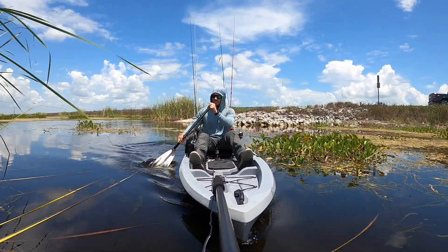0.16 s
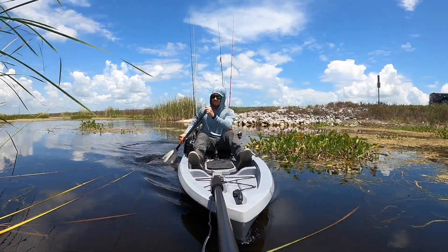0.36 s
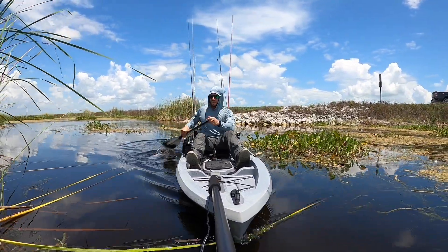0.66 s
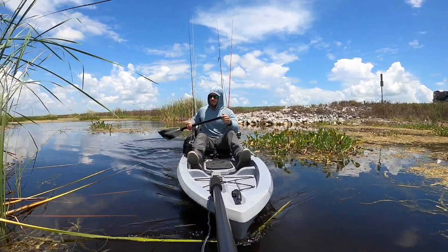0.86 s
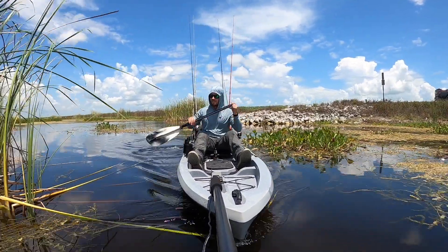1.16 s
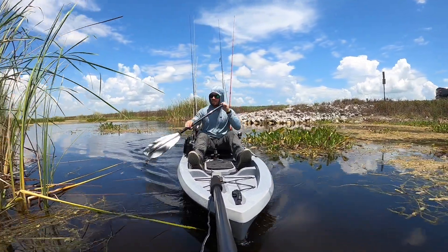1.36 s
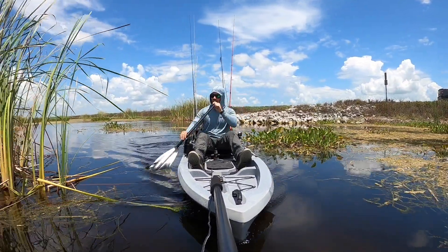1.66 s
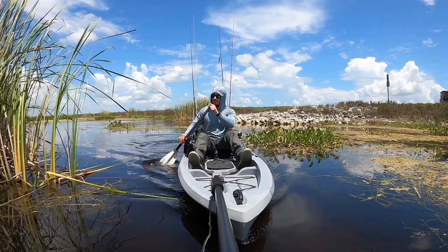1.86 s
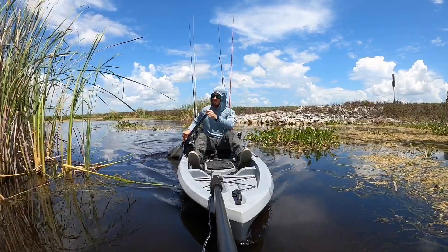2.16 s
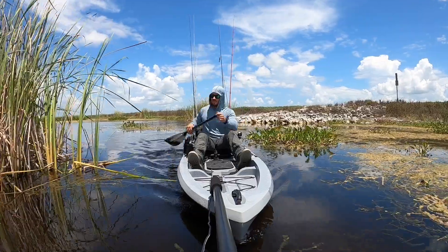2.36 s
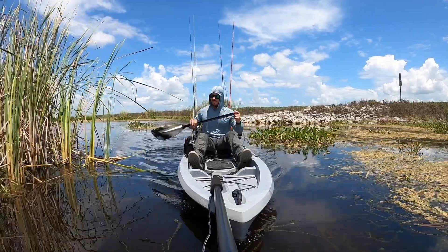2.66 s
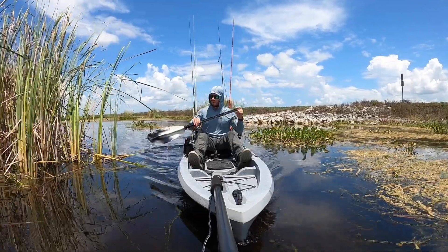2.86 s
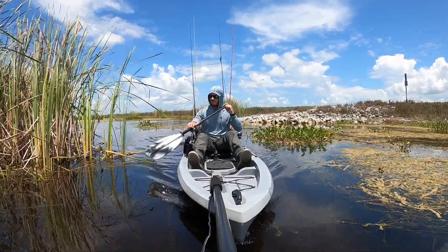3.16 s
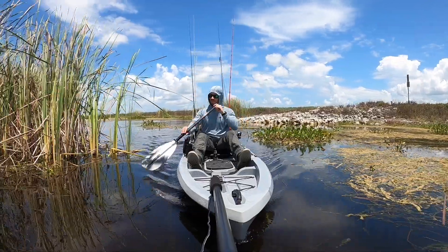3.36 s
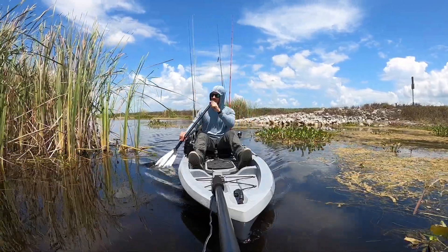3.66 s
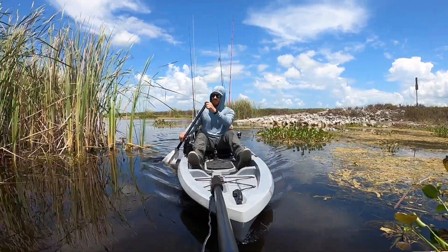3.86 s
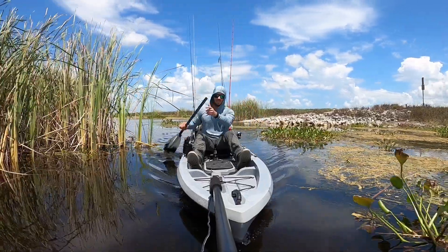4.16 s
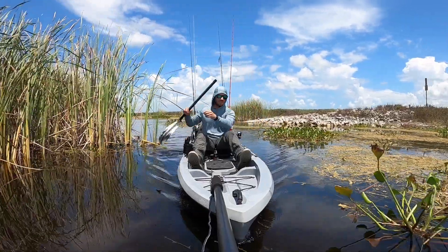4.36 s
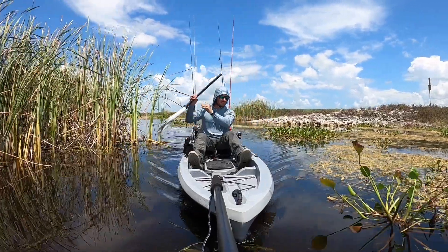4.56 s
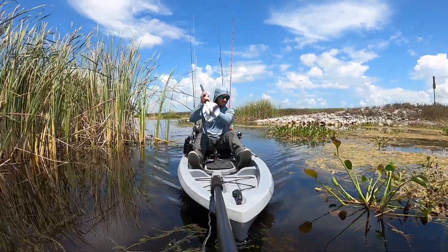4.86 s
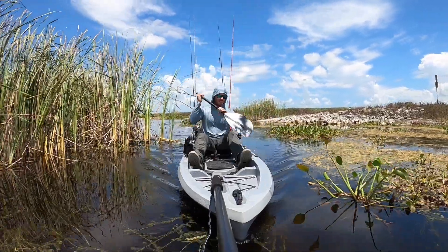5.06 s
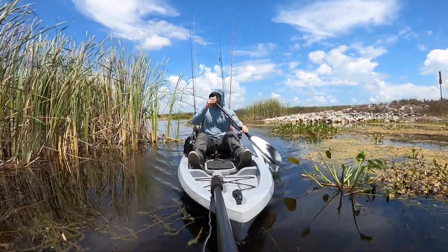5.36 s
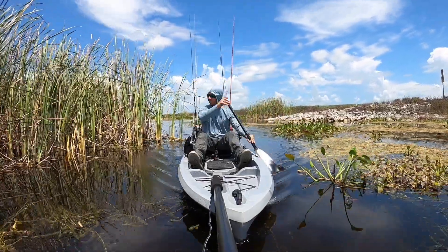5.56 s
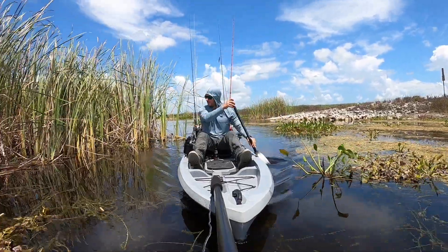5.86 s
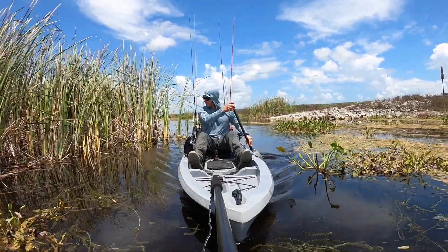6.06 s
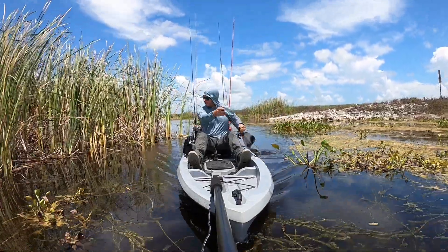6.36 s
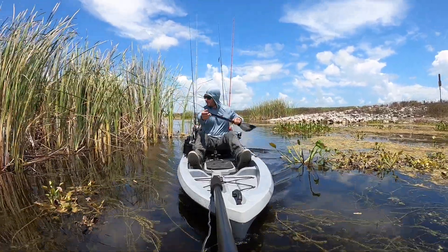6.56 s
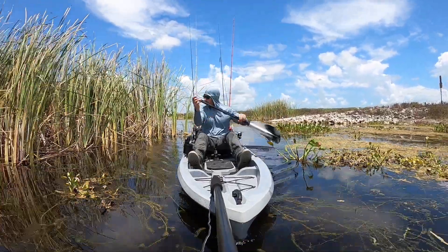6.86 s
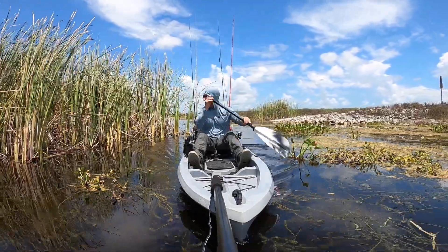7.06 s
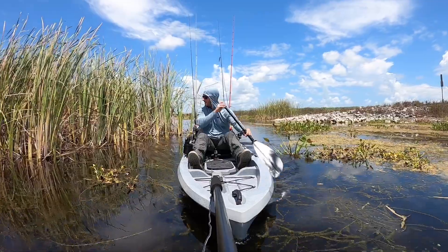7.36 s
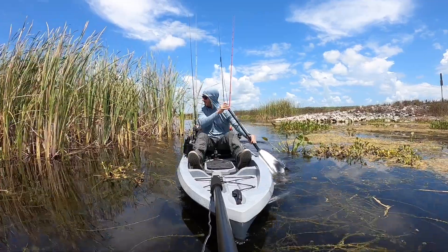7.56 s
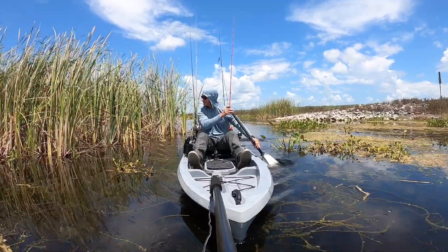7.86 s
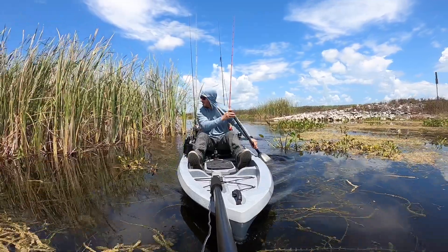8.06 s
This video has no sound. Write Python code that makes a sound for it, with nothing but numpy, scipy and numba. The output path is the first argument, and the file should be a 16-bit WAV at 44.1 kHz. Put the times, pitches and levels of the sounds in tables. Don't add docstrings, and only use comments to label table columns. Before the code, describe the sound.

Close stereo view from over the bow of a plastic kayak in shallow, weedy water outdoors. The paddle churns up gurgles, round bubble plops and bright drips, densest in the first two and a half seconds, with a sharp stem snap early. Quieter gaps and separate plops follow, then more strokes from the right and a double knock on the hull near the end. A distant engine wavers low beneath.

```python
import sys
import numpy as np
from scipy import signal
from scipy.fft import rfft, irfft
from scipy.io import wavfile
from scipy.ndimage import uniform_filter1d
from numba import njit

SR = 44100
rng = np.random.default_rng(int(sys.argv[2]) if len(sys.argv) > 2 else 0)


def undo_db(level):
    steps = np.asarray(level, float) / 20
    return 10 ** steps


def unload_wav(signal):
    wavfile.write(
        sys.argv[1],
        SR,
        np.round(np.clip(np.atleast_2d(signal).T, -1, 1) * 32767).astype(np.int16),
    )


N = 362061
OPPOSITE = np.array([[1], [-1]])


def unit(x):
    return x / np.sqrt(np.mean(x ** 2))


def curve(table):
    return np.interp(np.arange(N) / SR, *np.transpose(table))


def walk(rate):
    hold = int(SR / rate)
    steps = np.repeat(rng.standard_normal(N // hold + 1), hold)
    return 1.3 * uniform_filter1d(uniform_filter1d(steps, hold), hold)[:N]


def band(x, lo_hz, hi_hz):
    return signal.sosfilt(signal.butter(2, [lo_hz, min(hi_hz, 20000)], "band", fs=SR, output="sos"), x)


def pan(db):
    return undo_db(np.array([db, -db]) / 2)


def add(out, s, sound, side_db):
    i = int(round(s * SR))
    out[:, i:i + sound.shape[-1]] += (sound * pan(side_db)[:, None])[:, :N - i]


def humps(rows, rest_db):
    t = np.arange(0, N + 64, 64) / SR
    power = undo_db(2 * rest_db)
    for s, db, rise, fall in rows:
        tens_down = np.where(t < s, (s - t) / max(rise, 1e-3), (t - s) / max(fall, 1e-3))
        power = power + undo_db(2 * db - 20 * tens_down)
    return np.interp(np.arange(N) / SR, t, 10 * np.log10(power))


@njit
def ring(rows, n):
    out = np.zeros((2, n))
    for r in rows:
        start, left, w, phase = int(r[0] * SR), 10 ** (r[6] / 40), 2 * np.pi * r[2] / SR, 0.
        glide = 2 ** (r[3] / SR)
        fade = 1000 ** (-1 / (r[5] * SR))
        swell = np.exp(-1 / (r[4] * SR + 1))
        a, gap = r[1], 1.
        for i in range(start, min(n, start + int((r[5] + 3 * r[4]) * SR))):
            phase += w
            w = min(w * glide, 2.8)
            gap *= swell
            a *= fade ** (1 - gap)
            v = a * (1 - gap) * np.sin(phase)
            out[0, i] += v * left
            out[1, i] += v / left
    return out


# (frequency [Hz], level per Hz [dB])
ROAD_COLOUR = [(15, -52), (30, 5.5), (50, 7.5), (100, 8.5), (220, -9.5), (260, -12.5), (600, -25.5),
               (1000, -24.5), (1400, -32.5), (2200, -52), (3200, -57.5), (7500, -53), (13000, -62.5),
               (15700, -80.5)]


def road():
    hz = np.maximum(np.arange(N // 2 + 1) * SR / N, 1)
    colour_hz, colour_db = np.transpose(ROAD_COLOUR)
    colour = undo_db(np.interp(np.log(hz), np.log(colour_hz), colour_db))
    mid, side = rfft(rng.standard_normal((2, N))) * colour
    side = side * np.clip(.1 + 12 / hz + hz / 5000, 0, 1)
    lean = pan(-4. * np.clip(hz / 9300.0, 0, 1))
    hum = unit(irfft(lean * [mid + side, mid - side], N))
    return undo_db(-35.5 + 1.0 * walk(3.76)) * hum


# (time [s], level [dB])
INSECT_LEVEL = [
    (0.0, -95),
    (0.91, -82),
    (2.81, -83.5),
    (3.45, -75),
    (3.86, -90),
    (5.19, -75),
    (5.56, -78),
    (6.52, -74),
    (6.75, -86),
    (8.21, -75),
]


def insects():
    hiss = unit(band(rng.standard_normal((2, N)), 10600, 13800))
    rasp_db = 2.3 * walk(120) + 1.3 * walk(4.5)
    return undo_db(curve(INSECT_LEVEL) - 0.5 + rasp_db) * hiss * pan(-2.0)[:, None]


# (frequency [Hz], width [Hz], level [dB])
ENGINE_ORDERS = [
    (135.46, 12.4, -43),
    (159.75, 15.5, -45.5),
    (211.4, 28.7, -49.5),
    (297.7, 17, -66.5),
]
# (time [s], peak level [dB])
ENGINE_SWELLS = [(.28, -25.5), (.849, -32), (1.09, -25), (1.42, -28.5), (1.67, -25), (2.02, -30),
                 (2.22, -29), (2.78, -31), (3.13, -27.5), (3.57, -31.5), (3.82, -30.5), (4.51, -27),
                 (4.72, -29.5), (4.93, -32), (5.24, -30), (5.6, -32.5), (5.85, -31.5), (6.33, -26),
                 (6.67, -28), (6.939, -29), (7.2, -34.5), (7.5, -30.5), (7.75, -30.5), (8.115, -27.5)]


def engine():
    firing_hz, lull_db, fade_s = 68.77, -39, .15
    level_db = humps([(s, db, fade_s, fade_s) for s, db in ENGINE_SWELLS], lull_db)
    phase = 2 * np.pi * firing_hz * np.cumsum(1 + 0.0344 * walk(14)) / SR
    out = np.sqrt(2) * undo_db(level_db + 2.2 * walk(18)) * np.sin(phase)
    for hz, width, db in ENGINE_ORDERS:
        out = out + undo_db(db) * unit(band(rng.standard_normal(N), hz - width / 2, hz + width / 2))
    return out


# (time [s], peak level [dB], frequency [Hz])
TICK_DROPS = [(0.129, -35.5, 2500), (0.1641, -42, 6300), (0.3226, -32.5, 2530), (0.5183, -47.0, 7980),
              (0.553, -43.0, 6300), (0.7276, -47.5, 10000), (1.056, -40, 5000), (1.1572, -44, 3000),
              (1.6463, -55, 8000), (1.96, -47, 9900), (2.0375, -53, 8000), (2.393, -39, 6330),
              (2.4672, -42.5, 6300), (2.851, -53.5, 10000), (2.9922, -48.0, 8000), (3.291, -56, 6300),
              (3.462, -46.5, 6400), (3.739, -45, 3200), (4.1256, -43, 8950), (4.1908, -46, 6300),
              (4.3025, -47, 6300), (4.3426, -32, 2500), (4.3838, -48.5, 10000), (4.414, -47.5, 10000),
              (5.914, -49, 5000), (6.2114, -41, 2400), (6.4432, -47.0, 6300), (6.5484, -54, 6300),
              (6.6632, -49, 6300), (6.9173, -45.5, 4000), (7.0303, -48, 6300), (.0853, -46, 2500),
              (7.125, -52.0, 10000), (1.7989, -44, 9000), (8.1889, -43, 4000), (7.5039, -50, 2100),
              (7.597, -45, 5000), (7.77, -49.0, 6300), (7.9753, -48, 4970), (8.037, -41, 3200),
              (8.064, -41, 3200)]


def ticks():
    out, t = np.zeros((2, N)), np.arange(int(0.026 * SR)) / SR
    shape = np.exp(-t / 0.0017) + .12 * np.exp(-t / .008)
    for s, db, hz in TICK_DROPS:
        mid, side, where = rng.standard_normal((3, len(t)))
        click = unit(band(mid + 0.33 * side * OPPOSITE, 0.69 * hz, 1.18 * hz))
        add(out, s, undo_db(db - 3.5) * click * shape, 2.5 * where[0] - hz / 2500)
    return out


# (time [s], level [dB])
HULL_KNOCKS = [
    (7.417, -17.5),
    (7.446, -29),
]
# (frequency [Hz], level [dB], t60 [s])
HULL_MODES = [(104.8, -6, 0.54), (134, -3, 0.36), (172, -3, 0.213), (192, 4.5, 0.19), (240, -10.5, 0.38),
              (278, 3.5, 0.071), (415, 8, 0.024), (462, -1.5, 0.038), (950, 2.5, 0.025),
              (1400, -9.5, 0.023), (1890, -8, 0.017), (2300, -4.5, 0.01), (2800, -7.5, 0.0076)]


def knock():
    rows = []
    for s, db in HULL_KNOCKS:
        for hz, mode_db, t60 in HULL_MODES:
            size = undo_db(db + mode_db + 2.17 * rng.standard_normal())
            rows.append((s + 0.59 / hz, size, hz, 0., 0.31 / hz, t60, -4.))
    return ring(np.array(rows), N)


# (time [s], peak level [dB], frequency [Hz], half width [s])
STEM_SNAP = (.60112, -5.5, 3500, .00013)


def stem_snap():
    out = np.zeros((2, N))
    s, db, hz, width = STEM_SNAP
    t = np.arange(-40, 40) / SR
    pulse = np.exp(-.5 * (t / width) ** 2) * np.cos(2 * np.pi * hz * t + .3)
    add(out, s + t[0], undo_db(db) * pulse, 1.5)
    return out


# (time [s], left minus right [dB])
PADDLE_SIDE = [
    (0, -0.5),
    (5, 2),
    (5.6, -2),
    (8.21, -2),
]


def paddle_side(s):
    return np.interp(s, *np.transpose(PADDLE_SIDE))


# (time [s], peak level [dB], frequency [Hz])
WATER_SLAPS = [(.784, -28, 3600), (0.928, -30.5, 5250), (1.1518, -32, 4370), (1.662, -33, 3600),
               (1.749, -38.5, 4100), (1.805, -33.5, 5500), (1.8348, -29, 3280), (1.9187, -37, 4740),
               (2.2922, -31, 3220), (2.309, -33, 3870), (2.4145, -34.5, 3770), (2.797, -35.5, 3200),
               (3.645, -36, 5750), (3.656, -32, 6600), (3.7477, -32.5, 3460), (4.1249, -40, 3820),
               (4.1474, -26.5, 3770), (4.285, -38, 3430), (6.4712, -36, 5400), (6.5364, -38, 4600),
               (7.1507, -31, 5500), (7.4165, -30, 3500), (7.445, -31.5, 3720), (7.5423, -44, 3350),
               (7.718, -41, 3240), (7.8913, -43.5, 4650), (8.0924, -37, 3830)]


def slaps():
    out, t = np.zeros((2, N)), np.arange(int(.06 * SR)) / SR
    shape = (1 - np.exp(-t / 0.00023)) * (np.exp(-t / 0.0032) + 0.17 * np.exp(-t / 0.011))
    for s, db, hz in WATER_SLAPS:
        rumble = rng.standard_normal((2, len(t))).cumsum(axis=0)
        fizz = unit(band(band(rumble, 0.5 * hz, 1.31 * hz), 100, 2.0 * hz))
        add(out, s, undo_db(db - 8.0) * fizz * shape, paddle_side(s) + 3 * rng.standard_normal())
    return out


# (time [s], peak level [dB], start frequency [Hz], rise [octaves/s], length [s])
POCKET_GLUGS = [
    (0.58, -25, 319, 5.4, 0.014),
    (0.887, -26.5, 647, 33.8, 0.037),
    (3.813, -54, 1750, 99, 0.013),
    (7.951, -34.5, 603, 0.29, 0.055),
    (2.811, -33.5, 278, 3.1, 0.016),
    (6.681, -39, 385, 1.5, 0.02),
]


def glugs():
    out = np.zeros((2, N))
    for s, db, hz, rise, length in POCKET_GLUGS:
        swelling = min(.05 + 0.015 * rise, 0.68)
        t = np.arange(int(length * SR)) / SR
        swell = np.sin(np.pi / 2 * np.interp(t, [0, swelling * length, length], [0, 1, 0]))
        tone = np.sin(2 * np.pi * hz * np.cumsum(2 ** (rise * t)) / SR)
        add(out, s, undo_db(db) * swell * tone, paddle_side(s))
    return out


# (time [s], peak level [dB], frequency [Hz])
BURSTING = [(.309, -26, 1130), (.643, -12, 670), (.712, -17, 1320), (1.259, -31, 1980), (1.356, -23, 1020),
            (1.807, -27, 2560), (2.361, -17.5, 1220), (2.367, -18.5, 910), (2.369, -18.5, 2100),
            (2.448, -25, 1260), (2.696, -33, 2840), (3.861, -35, 1350), (4.148, -23, 2110),
            (4.285, -32.5, 3350), (5.654, -30.5, 1745), (6.349, -25.5, 1570), (6.688, -26, 1540),
            (7.624, -15.5, 1530), (7.579, -27.5, 2060)]
# (time [s], peak level [dB], frequency [Hz], rise [octaves/s])
RINGING = [(.169, -33, 1490, 16), (.66, -28, 566, 7), (.664, -21.5, 1030, 0), (1.668, -30.5, 2470, 44),
           (1.838, -29.5, 1390, -1), (1.983, -23.5, 1400, -5), (2.084, -28, 980, 8), (2.091, -30, 1660, 31),
           (2.221, -23.5, 2110, 25), (.717, -26, 605, 3.5), (2.298, -24, 1210, 105), (2.368, -18, 570, 0),
           (1.195, -30, 557, -4), (3.648, -26, 824, 17), (3.748, -13.5, 1077, 69), (3.831, -35, 2300, 20),
           (3.963, -35, 1120, 24), (4.068, -26.5, 1200, 63), (4.148, -25.5, 2990, 81),
           (4.15, -16.5, 1334, -14), (4.284, -30, 1720, 4), (4.541, -37, 1457, -15),
           (5.723, -27.5, 1805, 32), (6.211, -29, 1500, -8), (6.249, -26, 1530, 35.5),
           (6.25, -21.5, 950, 6), (6.515, -24.5, 1170, -8.5), (7.621, -18, 1090, -6), (8.188, -35, 1674, 8)]
# (time [s], peak level [dB], frequency [Hz], t60 [s], rise [octaves/s])
HELD_UNDER_WEEDS = [(.248, -29, 950, 0.033, 10), (.38, -35.5, 482, 0.15, 5), (.446, -32.5, 1007, 0.061, 15),
                    (.713, -20, 890, 0.039, 7), (1.165, -27.5, 913, 0.055, -1.5),
                    (1.749, -26, 1040, 0.041, 2), (1.848, -35, 1350, 0.07, -6), (1.9, -34, 1150, 0.11, -2),
                    (2.065, -29.5, 1040, 0.039, 33), (2.123, -34, 950, 0.13, 5),
                    (2.125, -35.5, 481, 0.11, -0.5), (2.262, -23, 1225, 0.024, 8),
                    (2.81, -29, 399, 0.047, 27), (4.012, -35.5, 1690, .035, 11),
                    (4.15, -25.5, 732, 0.059, 0.5), (5.83, -44.5, 1500, 0.031, 98),
                    (5.742, -46, 2180, 0.025, 58), (6.214, -21.5, 880, 0.029, 13),
                    (6.449, -29.5, 1015, 0.052, 20.5), (6.31, -33.5, 690, 0.11, -6.5),
                    (6.345, -36, 560, .07, -4), (6.29, -43, 766, .05, -1), (.565, -26.5, 770, .02, 21),
                    (7.551, -25, 957, 0.041, 6), (7.575, -28.5, 843, 0.04, 13),
                    (7.724, -41, 1580, 0.034, -6), (8.1, -39, 1550, 0.091, -12)]
# (time [s], peak level [dB], frequency [Hz])
BLADE_TRICKLE = [(.06, -41, 1090), (.34, -39, 1030), (.353, -37, 1015), (.366, -38.5, 1680),
                 (.371, -37, 1210), (.491, -30, 984), (.503, -31, 950), (.508, -30.5, 1240),
                 (.526, -36, 1340), (.578, -24.5, 538), (.606, -30, 1260), (.628, -27, 1070),
                 (.66, -31, 595), (.862, -31.5, 1070), (.87, -30.5, 1420), (1.113, -38, 1220),
                 (1.139, -40, 1120), (1.164, -35, 554), (1.22, -36, 1030), (1.266, -39, 1680),
                 (1.861, -39, 1130), (1.88, -38, 1090), (1.886, -35, 1400), (1.918, -38, 1165),
                 (2.103, -35.5, 1020), (2.117, -34, 1210), (2.126, -35, 1550), (2.146, -35, 1590),
                 (2.191, -31, 1080), (2.227, -28, 1210), (2.261, -31, 688), (2.294, -34, 870),
                 (2.312, -33, 633), (2.313, -30, 1030), (2.322, -32, 1420), (2.331, -27, 825),
                 (2.462, -34, 1280), (2.489, -37, 1410), (2.526, -36, 1010), (2.584, -39, 1280),
                 (2.713, -38.5, 1080), (2.753, -36.5, 1420), (3.648, -34, 1320), (3.994, -38, 1080),
                 (4.068, -37, 727), (4.123, -30.5, 880), (4.179, -37, 690), (4.224, -39, 1250),
                 (4.246, -38, 1470), (4.357, -41, 1590), (4.409, -36, 1260), (4.447, -42, 1210),
                 (4.516, -43, 1420), (4.518, -39, 1065), (5.72, -37.5, 1036), (5.746, -41, 1080),
                 (5.901, -39, 980),
                 (6.197, -35.5, 1250), (6.418, -37, 830), (6.432, -35, 1680), (6.572, -40, 780),
                    (6.651, -35, 1330), (6.695, -34, 1210), (7.148, -43, 1240), (7.356, -40, 1160),
                    (7.59, -30.5, 950), (7.734, -36.5, 1450), (7.871, -43, 726), (8.092, -43, 640)]
# (time [s], peak level [dB], frequency [Hz])
FALLING_DROPLETS = [(.13, -36, 2370), (.181, -37, 1930), (.323, -40, 2890), (.344, -32.5, 4000),
                    (.392, -37, 3250), (.424, -36, 2020), (.52, -33, 2240), (.663, -34, 2540),
                    (.729, -30, 2310), (.812, -32, 3010), (.841, -34, 3790), (.927, -35, 5200),
                    (1.106, -37, 3490), (1.668, -30.5, 3470), (1.807, -39, 5300), (1.84, -35, 3100),
                    (2.081, -41, 2670), (2.214, -26, 1510), (2.293, -31, 2890), (2.309, -32, 5200),
                    (2.416, -34, 3400), (2.509, -32.5, 2930), (2.578, -35, 2800), (2.799, -38, 2300),
                    (3.657, -37, 5400), (3.675, -41, 4180), (3.831, -42, 4310), (4.183, -34, 2370),
                    (4.193, -35, 1840), (4.385, -37, 1940), (4.417, -45, 2890), (4.609, -43, 1920),
                    (4.674, -42.5, 2150), (4.787, -45, 2300), (5.915, -42, 2070), (6.076, -55, 2890),
                    (6.165, -38.5, 2000), (6.215, -41, 3360), (6.502, -36, 3320), (6.538, -35, 3820),
                    (6.6, -42, 3270), (6.666, -38, 2020), (7.543, -46, 3060), (7.622, -40, 5050),
                    (7.858, -44, 4080), (7.923, -48, 4030), (7.938, -41, 1520), (7.992, -43.5, 1590),
                    (8.064, -39, 3360), (8.072, -35.5, 1670), (8.089, -39, 2760), (8.1, -43, 1930),
                    (8.108, -36, 3830)]


def bubbles():
    # (s, peak dB, Hz, t60 s, octaves per s); the smallest die after a set count of cycles
    events = [(s, db, hz, 0.0086, 10) for s, db, hz in BURSTING]
    events += [(s, db, hz, .018, rise) for s, db, hz, rise in RINGING]
    events += HELD_UNDER_WEEDS
    events += [(s, db, hz, 38 / hz, 4.0) for s, db, hz in BLADE_TRICKLE]
    events += [(s, db, hz, 39 / hz, 5.9) for s, db, hz in FALLING_DROPLETS]
    rows = [(s, undo_db(db), hz, rise, 0.00033 + .035 * t60, t60, paddle_side(s)) for s, db, hz, t60, rise in events]
    return ring(np.array(rows), N)


def grains(per_s, mid_hz, octaves, cycles, spread_db, rise, wide_db, side_db):
    c = rng.random((int(N / SR * 2000), 7))
    c = c[c[:, 4] < per_s / 2000]
    at = (c[:, 0] * (N - 1)).astype(int)
    hz = mid_hz[at] * 2 ** (octaves * (c[:, 1] + c[:, 5] - 1))
    t60 = cycles / hz * 2 ** (2 * c[:, 6] - 1)
    size = undo_db(-spread_db * np.log(1 - c[:, 2]).clip(-3, 0))
    where = side_db[at] + wide_db * (2 * c[:, 3] - 1)
    return unit(ring(np.stack([at / SR, size, hz, rise * c[:, 3] / t60, 2 / hz, t60, where], axis=1), N))


def wash(lo_hz, hi_hz, patchy_db, wide):
    mid, side = band(rng.standard_normal((2, N)), lo_hz, hi_hz)
    return unit(undo_db(patchy_db * walk(40)) * (mid + wide * side * OPPOSITE))


# (peak time [s], level [dB], rise per 10 dB [s], fall per 10 dB [s], brightness [dB])
BLADE_PULLS = [(.09, -56.5, 4, 1.25, 3), (.305, -45.5, -0.02, 0.18, 3), (.56, -39, 0.07, -0.03, -21),
               (.72, -44.5, 0.34, 0.28, 6.5), (.92, -44, 0.38, 0.16, 3.5), (1.18, -45.5, 0.12, 0.32, 2),
               (1.57, -54, 0.06, 0.1, 4), (1.845, -47, 0.02, 0.3, 1.5), (2.08, -45, 0.1, 0.19, -1.5),
               (2.19, -47, 0.12, 0.09, 3), (2.3, -37.5, 0.13, 0.2667, 1), (2.8, -54.5, 0, 0.35, -1.5),
               (4.14, -44, 0.025, 0.09, -0.5), (4.225, -46, 0.04, 0.0666, 5.5),
               (4.29, -48.5, 0.0044, 0.1146, 5.5), (4.4, -49.5, 0.05, 0.0944, 6.5),
               (4.54, -52.5, 0.48, 0.13, -5), (4.62, -56, 0.17, 0.13, 3.5), (6.03, -55.5, 0.3, 0.2, -38),
               (6.28, -45, 0.1, 0.3, -7), (6.44, -45.5, 0.0466, 0.35, 2.5),
               (6.76, -48.5, 0.33, -0.05, -0.5), (6.92, -53.5, 0.14, -0.6, 2), (7.27, -53, .5, 0.4, -23.5),
               (7.95, -55, 0.15, 0.06, 0), (7.87, -60, 0.2, -0.4, 2), (8.05, -57, 0, -0.3, 7),
               (8.11, -56, 0.01, -0.7, 9.5), (8.19, -50, 0.004, 0.2, 9)]
# (time [s], level [dB], brightness [dB])
SINGLE_SPLASHES = [
    (1.662, -68, 3),
    (3.646, -45.5, -2.5),
    (3.75, -43, -11),
    (3.95, -45.5, -12),
    (5.72, -47.5, -6),
    (5.901, -52.5, 2.5),
    (7.149, -51.5, 7),
    (7.421, -43.5, 2.5),
    (7.551, -44, -18),
    (7.59, -43.5, 0.5),
]
# (time [s], level [dB], fade per 10 dB either side [s])
SPRAY_FLICKS = [
    (1.62, -67.5, 1.7),
    (1.83, -71, 1.8),
    (3.1, -75, 3.5),
    (4.8, -73.5, 1.5),
    (7.72, -67.5, 0.5),
]


def stir():
    pulls = BLADE_PULLS + [(s, db, 0.0078, 0.034, bright) for s, db, bright in SINGLE_SPLASHES]

    def layer(under_db, tilt):
        return [(s, db + under_db + tilt * bright, rise, fall) for s, db, rise, fall, bright in pulls]

    flicks = [(s, db, fade, fade) for s, db, fade in SPRAY_FLICKS]
    gurgle_db = humps(layer(0, 0), -70.5)
    slosh_db = humps(layer(-8.5, 1), -77.5)
    spray_db = humps(layer(-20.5, 1.3) + flicks, -83)
    return gurgle_db, slosh_db, spray_db


# (time [s], frequency [Hz])
GURGLE_PITCH = [(0, 735), (.3, 950), (.6, 677), (.95, 1104), (1.5, 623), (1.83, 1246), (2.1, 865),
                (2.25, 1160), (2.4, 656), (2.55, 1226), (2.8, 498), (3.7, 1102), (4.7, 1483), (6.2, 950),
                (6.35, 528), (6.5, 1114), (8.21, 1276)]


def water():
    gurgle_db, slosh_db, spray_db = stir()
    side_db = paddle_side(np.arange(N) / SR)
    big = grains(650, curve(GURGLE_PITCH), 1.1, 28, 3.2, .7, 1.5, side_db)
    small = grains(900, np.full(N, 2300.), 1.1, 22, 3.6, .6, 4., side_db + 1.5)
    mist = grains(700, np.full(N, 6800.), 1., 24, 4.0, .5, 10., side_db - 6)
    crackle = grains(220, np.full(N, 3600.), 1.3, 6, 3.5, .3, 4., side_db)
    spit = grains(200, np.full(N, 8000.), .8, 6, 4., .3, 10., side_db - 6)
    gurgle = big + .25 * wash(290, 1300, 4., .15)
    slosh = small + .28 * crackle + .36 * wash(1500, 5500, 4., .45)
    spray = mist + .5 * spit + .35 * wash(4500, 11000, 4., .8) * pan(-4.)[:, None]
    clump_db = 2.0 * walk(30)
    fine = undo_db(slosh_db + 0.5) * slosh + undo_db(spray_db - 5.0) * spray
    return undo_db(gurgle_db - 2.5 + 1.48 * clump_db) * gurgle + undo_db(clump_db) * fine


def scene():
    near = knock() + stem_snap() + slaps() + glugs() + bubbles() + water()
    t = np.arange(int(.08 * SR)) / SR
    blur = rng.standard_normal((2, len(t))) * np.exp(-t / 0.02) * (t > .001)
    near = near + undo_db(-36.5) * signal.fftconvolve(near, blur, axes=1)[:, :N]
    return road() + insects() + engine() + ticks() + near


def top_cut(x):
    return signal.sosfilt(signal.butter(12, 15690, fs=SR, output="sos"), x)


def record(dry):
    left = np.append(dry[0, :1], dry[0, :-1])
    return top_cut(np.array([left, dry[1]]))


dry = scene()
out = record(dry)
unload_wav(out)
```